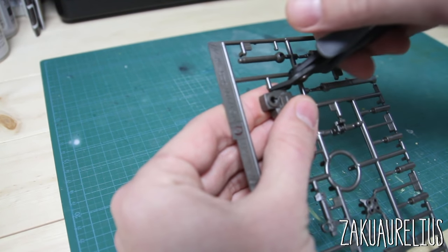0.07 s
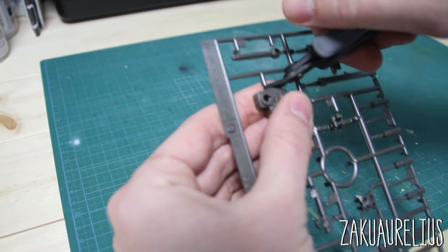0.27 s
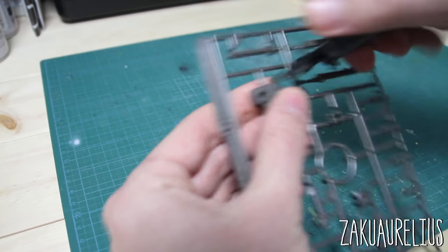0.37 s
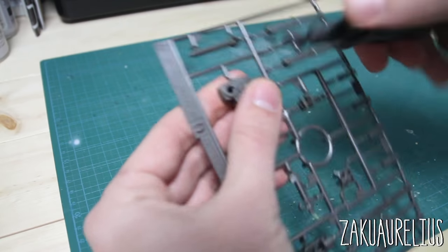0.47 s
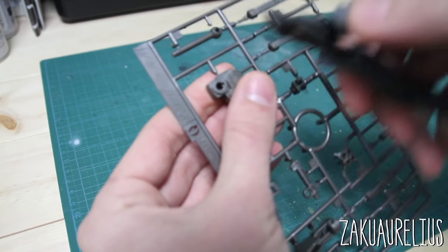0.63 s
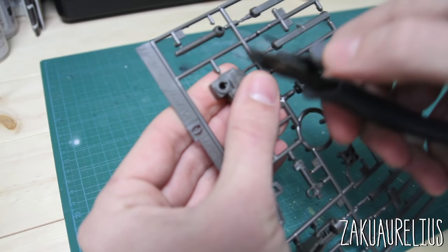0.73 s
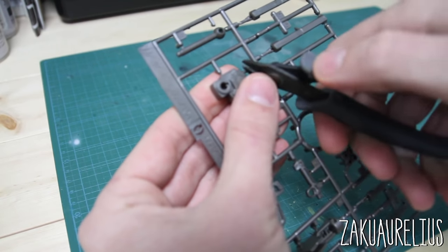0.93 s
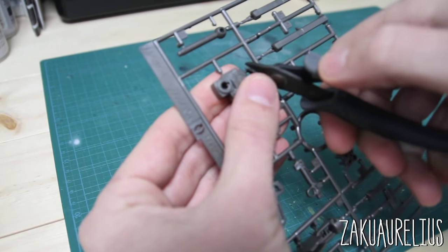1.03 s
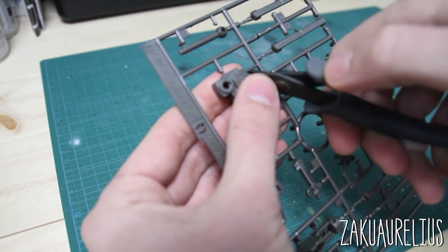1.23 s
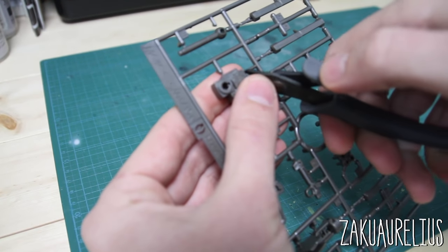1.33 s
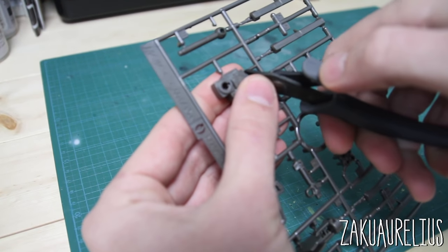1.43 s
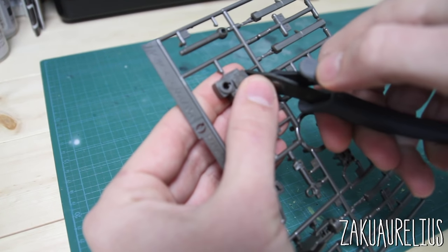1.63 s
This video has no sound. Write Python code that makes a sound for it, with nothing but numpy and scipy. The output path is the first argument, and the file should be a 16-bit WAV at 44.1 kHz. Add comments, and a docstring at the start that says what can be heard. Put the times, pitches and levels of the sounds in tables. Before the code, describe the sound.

Small side cutters snip thin plastic with one loud, bright crack, then the steel jaws click free and scrape briefly; the plastic frame knocks softly, then faint rubbing and quiet hiss, close microphone, small room.

```python
"""Side cutters on a plastic sprue

Close to the microphone in a small room, cutters snip a plastic gate: two bright cracks ring the sprue.
The steel jaws click free and scrape out along the frame, which knocks as the fingers turn it.
The cutters then slide softly onto the next gate, over faint hiss, mains hum and a thin whine.
Cracks are coloured bursts, ringing is damped sines, and rubbing is grainy filtered noise."""
import sys
import numpy as np
from scipy import signal
from scipy.fft import rfft, irfft, next_fast_len
from scipy.io import wavfile
from scipy.ndimage import map_coordinates

SR = 44100
rng = np.random.default_rng(int(sys.argv[2]) if len(sys.argv) > 2 else 0)


def to_wav(sig):
    """Store sig (one row per channel, or 1-D mono) as 16-bit WAV at the path in sys.argv[1].

    Samples outside -1..1 are clipped; the rate is SR.
    """
    pcm = np.clip(np.atleast_2d(sig), -1, 1) * 32767
    pcm = np.round(pcm).astype(np.int16)
    wavfile.write(sys.argv[1], SR, pcm.T)  # frames by channels


N = 74970


def snip():
    """The gate breaks in two quick cracks; the first sets the sprue's modes ringing."""
    # the gate breaking: (time [s], level [dB], tilt [dB per octave])
    fractures = [(0.2191, -2.5, -0.41), (0.2204, -9.5, 1.5)]
    # spectrum of a crack: (frequency [Hz], level [dB])
    crack_colour = [(60, -23.5), (400, -16), (1100, -13), (1700, -2), (2400, 0), (2850, -15.5), (3700, -3),
                    (5100, 1.5), (6500, -6.5), (8000, -3), (10000, -5), (12500, -1.5), (15700, -14)]
    # modes of the plastic sprue: (frequency [Hz], level [dB], T60 [s])
    sprue_modes = [(848, -14.5, 0.37), (1715, -6, 0.1), (1940, -19, 0.13), (2360, -18, 0.053),
                   (3990, -24, 0.033), (4510, -19, .14), (5050, 3, 0.039), (5510, -31, 0.094),
                   (6100, -30, 0.091), (6500, 3, 0.093), (7930, 6, 0.088), (8219, -24, 0.077),
                   (8987, -22, 0.061), (13000, 5, 0.061)]
    crack_t60_s, sprue_db, crack_room_db = 0.011, -25, -6.5

    start, first_db, _ = fractures[0]
    cracks = sum(amp(db) * burst(crack_colour, tilt, s, crack_t60_s) for s, db, tilt in fractures)
    cracks_in_room = cracks + amp(crack_room_db) * room(cracks)
    return cracks_in_room + amp(first_db + sprue_db) * ring(sprue_modes, start)


def jaws():
    """The jaws spring free in a bright double click that leaves the steel ringing briefly."""
    # the jaws springing free: (time [s], level [dB], tilt [dB per octave])
    jaw_clicks = [(0.3998, -12.5, 0), (.4015, -13, 7)]
    # spectrum of a click: (frequency [Hz], level [dB])
    clink_colour = [(100, -45), (400, -28), (1100, -11), (2300, -13.5), (2950, -28), (3750, -4),
                    (5400, -17.5), (8800, -20), (9800, -6.5), (12000, -2), (13600, -6.5), (15700, -19)]
    # modes of the steel cutters: (frequency [Hz], level [dB], T60 [s])
    steel_modes = [(3728, 2, .05), (4015, -10, .03), (4508, -12, .03), (10170, -15, .05), (10510, -11, .03),
                   (11095, -9, .08), (11790, -5, .09), (12310, -9, .06), (13500, -10, .04),
                   (14250, -14, .025)]
    clink_t60_s, steel_db, clink_room_db = 0.02, -9, -9.5

    start, first_db, _ = jaw_clicks[0]
    clicks = [amp(db) * burst(clink_colour, tilt, s, clink_t60_s) for s, db, tilt in jaw_clicks]
    clicks_in_room = sum(click + amp(clink_room_db) * room(click) for click in clicks)
    return clicks_in_room + amp(first_db + steel_db) * ring(steel_modes, start)


def scrape():
    """The blade scrapes out along the sprue: slips excite a few sharp resonances."""
    # loudness of the scrape: (time [s], level [dB])
    scrape_levels = [(.378, -64), (.388, -44), (.41, -36), (.436, -42), (.445, -38), (.464, -34),
                     (.472, -48.5), (.52, -72), (.56, -88)]
    # broad spectrum: (frequency [Hz], level [dB])
    scrape_colour = [(200, -10), (900, -1), (2000, -1), (4500, -3), (8000, -6.5), (12000, -13),
                     (15500, -19)]
    # resonances added to it: (frequency [Hz], width [Hz], level [dB])
    scrape_peaks = [(2000, 120, 2.5), (2970, 120, 4.5), (4440, 200, 7.5), (6000, 25, 16.5),
                    (7080, 140, 2.5)]
    return level(scrape_levels) * friction(scrape_colour, scrape_peaks)


def knocks():
    """The frame jolts and flexes: dull bursts plus bending modes, damped by the hand."""
    # knocks of the frame in the hand: (time [s], level [dB], tilt [dB per octave])
    jolts = [(.225, -40.5, 2), (.248, -33.5, 0.5), (0.273, -45, -5.5), (.392, -43.5, -2.5),
             (.4625, -31.5, 1.5), (0.493, -48, 0)]
    # spectrum of a knock: (frequency [Hz], level [dB])
    knock_colour = [(30, -40), (110, -7.5), (200, -5), (320, 0), (520, -0.5), (720, -16.5), (1300, -6),
                    (3000, -35), (15000, -55)]
    # bending modes of the whole frame: (frequency [Hz], level [dB], T60 [s])
    frame_modes = [(320, 4.5, 0.061), (404, 1.5, 0.063), (466, -3, 0.052), (560, -4, 0.058)]
    knock_t60_s, frame_db = 0.054, -7

    out = np.zeros(N)
    for s, db, tilt in jolts:
        thud = burst(knock_colour, tilt, s, knock_t60_s)
        out += amp(db) * (thud + amp(frame_db) * ring(frame_modes, s))
    return out


def taps():
    """Blade taps plastic: short noise ticks, each coloured by the spot that is touched."""
    # light taps: (time [s], level [dB], pitch [Hz], width between -6 dB points [octaves])
    touches = [(0.381, -36.5, 4500, 2.5), (0.386, -54, 2300, 0.8), (.388, -32.5, 6060, 1.5),
               (.498, -40, 1280, 0.86), (0.521, -46, 1800, 1.1), (0.659, -50.5, 980, 2),
               (0.664, -46, 1190, 3.2), (0.879, -53, 2200, 0.21), (.908, -50.5, 13000, .5),
               (.910, -51, 900, 1.2)]
    tap_t60_s = 0.038

    out = np.zeros(N)
    for s, db, pitch, width in touches:
        def spot(hz):
            return 1 / np.hypot(1, 2 * np.log2((hz + 1) / pitch) / width) ** 2
        tick = filtered(rng.standard_normal(N), spot)
        out += amp(db) * unit(tick) * decay(s, tap_t60_s)
    return out


def rubs():
    """Fingers and handles rub on plastic in soft swells with narrow resonances."""
    # rubbing swells: (time of peak [s], rise [s], fall [s], level [dB])
    rub_swells = [(.066, 0.033, 0.023, -51), (.205, 0.015, 0.025, -54), (.338, .03, 0.037, -50.5),
                  (.497, .035, 0.056, -45), (.582, .06, 0.061, -47.5)]
    # broad spectrum: (frequency [Hz], level [dB])
    rub_colour = [(59, -39), (100, -16), (249, -31), (334, -16), (533, -4), (1010, -5.5), (1540, -4.5),
                  (2610, -9), (3820, -11), (6090, -15), (15800, -18)]
    # resonances added to it: (frequency [Hz], width [Hz], level [dB])
    rub_peaks = [(1230, 14, 4), (1287, 24, 6.5), (1587, 32, 5), (3746, 44, 8)]
    return strokes(rub_swells) * friction(rub_colour, rub_peaks)


def slides():
    """Steel slides lightly in brief swells of grainy noise."""
    # sliding swells: (time of peak [s], rise [s], fall [s], level [dB])
    slide_swells = [(.067, .015, 0.021, -55), (.578, .03, 0.065, -66), (.96, 0.009, 0.022, -57.5),
                    (1.082, 0.046, 0.029, -53)]
    # spectrum of a slide: (frequency [Hz], level [dB])
    slide_colour = [(300, 11), (4000, -10), (9000, -5.5), (11800, 5.5), (13500, -2), (15800, -10)]
    return strokes(slide_swells) * friction(slide_colour)


def grip():
    """The grip rustles low: grainy noise weighted to the low mids."""
    # loudness of the rustle: (time [s], level [dB])
    grip_levels = [(0, -78), (.75, -67), (.92, -60), (1.0, -68), (1.11, -57), (1.17, -63), (1.33, -63.5),
                   (1.7, -65)]
    # spectrum of the rustle: (frequency [Hz], level [dB])
    grip_colour = [(30, -15), (110, -6), (220, 0.5), (350, -4), (600, -13), (2000, -35.5), (15000, -56)]
    return level(grip_levels) * friction(grip_colour)


def background():
    """Steady coloured hiss with sine tones for the mains hum and a thin whine."""
    # spectrum of the hiss: (frequency [Hz], level [dB])
    hiss_colour = [(15, -54), (25, -28), (48, -10.5), (235, -6.5), (276, -9), (486, -7), (572, -13),
                   (637, -11), (769, -12), (834, -10.5), (905, -10.5), (12100, -18.5), (15800, -25)]
    # hum and whine: (frequency [Hz], rms level [dB])
    tones = [(60, -80.5), (120, -71.5), (240, -72), (11717, -77.5)]
    hiss_db = -56.5

    hum = np.zeros(N)
    for hz, db in tones:
        cycles = hz * clock() + rng.random()
        hum += amp(db) * np.sqrt(2) * np.sin(2 * np.pi * cycles)
    return amp(hiss_db) * noise(hiss_colour) + hum


def room(x):
    """The short diffuse tail of the room, whose treble dies sooner than its bass."""
    # reverberation: (frequency [Hz], T60 [s])
    room_t60 = [(150, 0.54), (400, 0.32), (1040, 0.3), (2760, 0.16), (7280, 0.22), (15000, 0.17)]
    delay_s, build_s = 0.0018, 0.00099

    hz, t, grid = signal.stft(rng.standard_normal(SR // 2), SR, nperseg=256)
    fade = np.exp(-np.log(1000) * t / along(room_t60, hz)[:, None])
    tail = signal.istft(grid * fade, SR, nperseg=256)[1]
    since_arrival = np.maximum(np.arange(len(tail)) / SR - delay_s, 0)
    tail = tail * (1 - np.exp(-since_arrival / build_s))
    return signal.fftconvolve(x, tail / np.linalg.norm(tail))[:N]


def burst(colour, tilt_db, start, t60):
    """A very short crack whose energy is spread evenly over its tilted colour."""
    envelope = decay(start, t60)
    spectrum = rfft(rng.standard_normal(N) * envelope)
    even = irfft(spectrum / (np.abs(spectrum) + 1e-12), N)  # keeps the phases, flattens the spectrum
    crack = filtered(even, lambda hz: amp(along(colour, hz) + tilt_db * np.log2(hz + 1)))
    crack = crack * (envelope > 0)  # silent before the start
    return crack * np.linalg.norm(envelope) / np.linalg.norm(crack)


def ring(modes, start):
    """Damped modes, struck with a little chance in level and phase each time."""
    out = np.zeros(N)
    chance = rng.standard_normal((len(modes), 2))
    for (hz, db, t60), (extra_db, phase) in zip(modes, chance):
        tone = np.sin(2 * np.pi * hz * (clock() - start) + np.pi * phase)
        out += amp(db + extra_db) * decay(start, t60) * tone
    return out


def friction(colour, peaks=()):
    """Dense slips of uneven size through a body's colour and resonances, at rms 1."""
    slips_hz, scatter_db = 909, 2
    sizes = map_coordinates(rng.standard_normal(N), [clock() * slips_hz], order=1)
    slips = rng.standard_normal(N) * amp(scatter_db * sizes)

    def body(hz):
        resonance = 1
        for centre, width, db in peaks:
            damping = 1j * hz * width
            resonance = resonance + amp(db) * damping / (centre ** 2 - hz ** 2 + damping)
        return amp(along(colour, hz)) * resonance
    return unit(filtered(slips, body))


def strokes(rows):
    """Bell-shaped swells that rise to a peak and fall away."""
    t = clock()
    out = np.zeros(N)
    for peak, rise, fall, db in rows:
        span = np.where(t < peak, rise, fall)
        out += amp(db) * np.exp(-2 * ((t - peak) / span) ** 2)
    return out


def decay(start, t60, attack=0.00012):
    """A quick exponential rise, then a steady fall in dB; times in seconds."""
    t = np.maximum(clock() - start, 0)
    return (1 - np.exp(-t / attack)) * np.exp(-np.log(1000) * t / t60)


def noise(colour):
    """Noise of rms 1 with the given (frequency [Hz], level [dB]) colour."""
    return unit(filtered(rng.standard_normal(N), lambda hz: amp(along(colour, hz))))


def filtered(x, response):
    """x shaped by a response that is a function of frequency in Hz."""
    size = next_fast_len(N + SR // 2)
    return irfft(rfft(x, size) * response(np.fft.rfftfreq(size, 1 / SR)), size)[:N]


def level(rows):
    """Gain per sample, drawn between (time [s], level [dB]) points."""
    return amp(np.interp(clock(), *np.transpose(rows)))


def along(points, hz):
    """Values between (frequency [Hz], value) points on a log frequency axis."""
    f, values = np.transpose(points)
    return np.interp(np.log(hz + 1), np.log(f + 1), values)


def clock():
    """The time of every sample in seconds."""
    return np.arange(N) / SR


def unit(x):
    """Scaled to rms 1."""
    return x / np.sqrt(np.mean(x ** 2) + 1e-20)


def amp(db):
    """Decibels to gain."""
    return 10 ** (np.asarray(db) / 20)


def scene():
    """All sources in mono; the handling sounds share one room tail."""
    handling_room_db = -7.5
    handling = taps() + knocks() + (scrape() + rubs() + slides() + grip())
    cutting = snip() + jaws()
    handling_tail = amp(handling_room_db) * room(handling)
    return (cutting + handling + handling_tail + background())[None]


def record(dry):
    """The recorder rounds off the loudest peaks and cuts steeply above its band limit."""
    ceiling, top_hz = 1.6, 15750  # ceiling relative to full scale
    held = dry[0] / (1 + np.abs(dry[0] / ceiling) ** 6) ** (1 / 6)
    low_pass = signal.ellip(12, 0.1, 90, top_hz, fs=SR, output="sos")  # ripple, stop band [dB]
    return signal.sosfilt(low_pass, held)[None]


dry = scene()
out = record(dry)
to_wav(out)
```